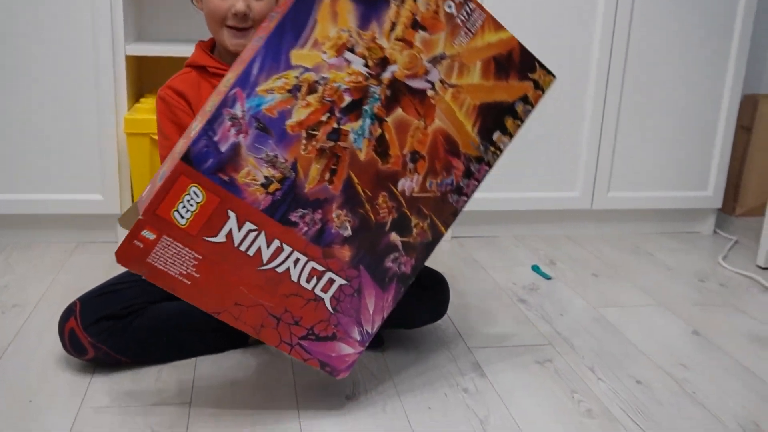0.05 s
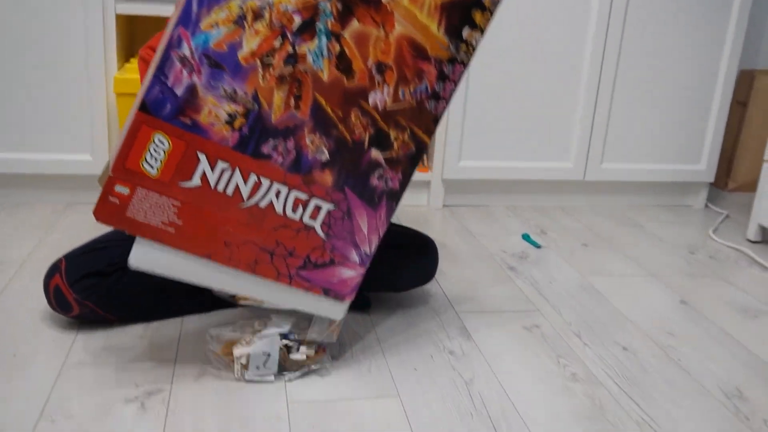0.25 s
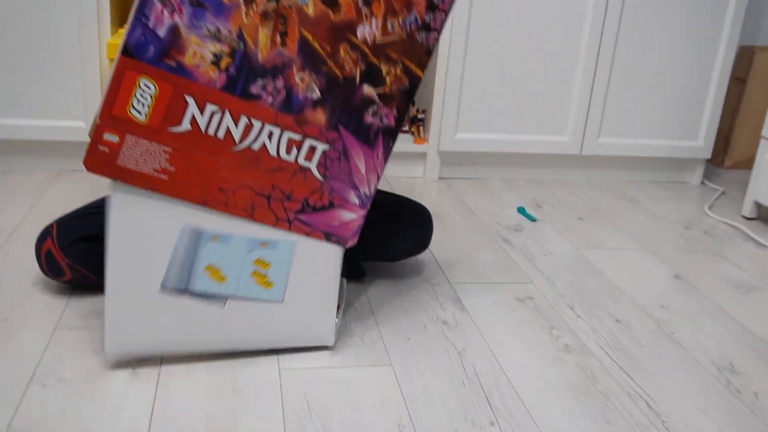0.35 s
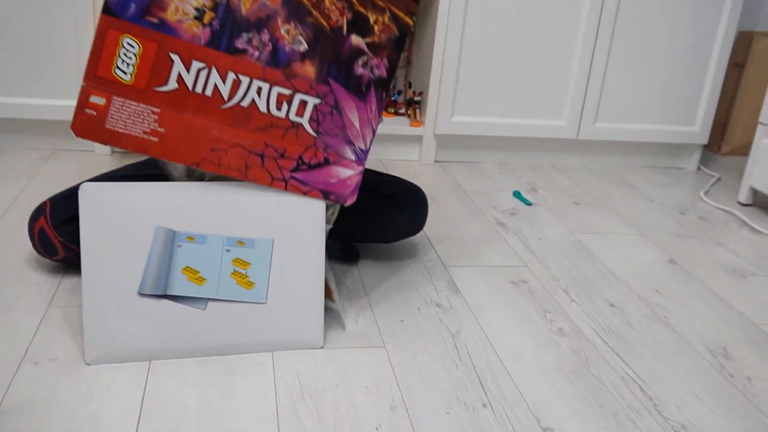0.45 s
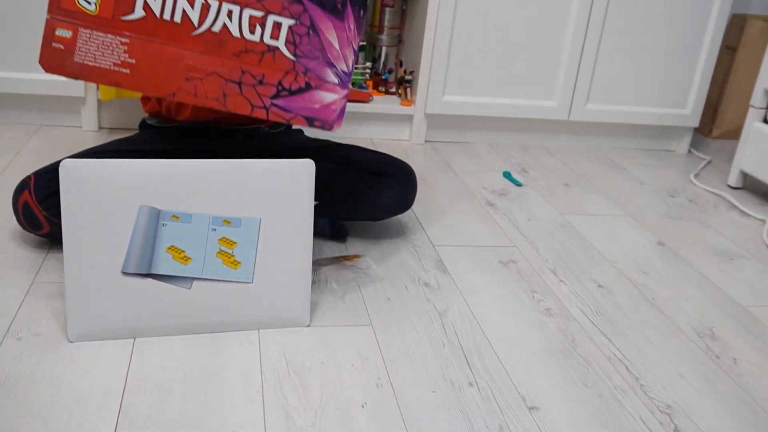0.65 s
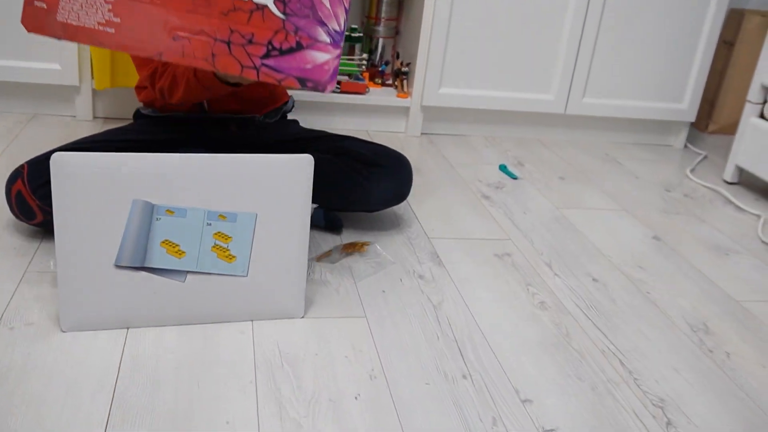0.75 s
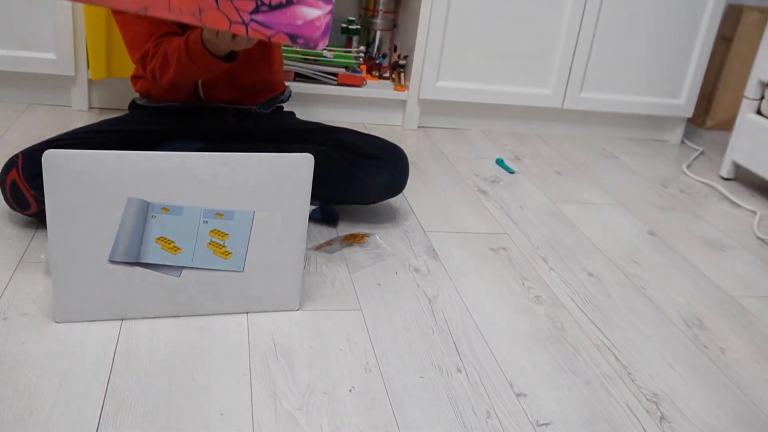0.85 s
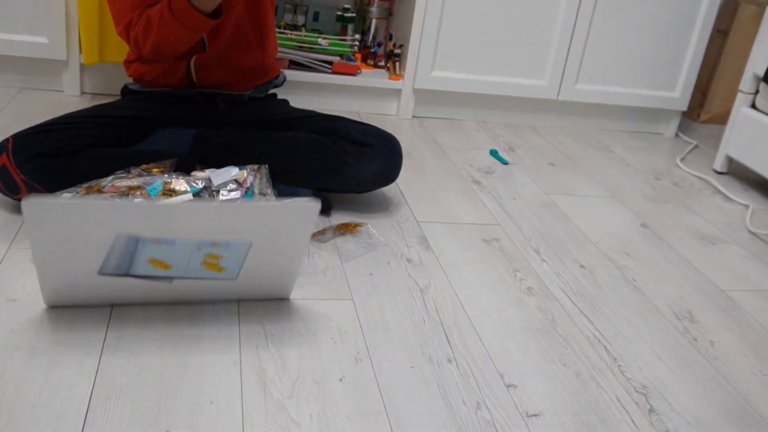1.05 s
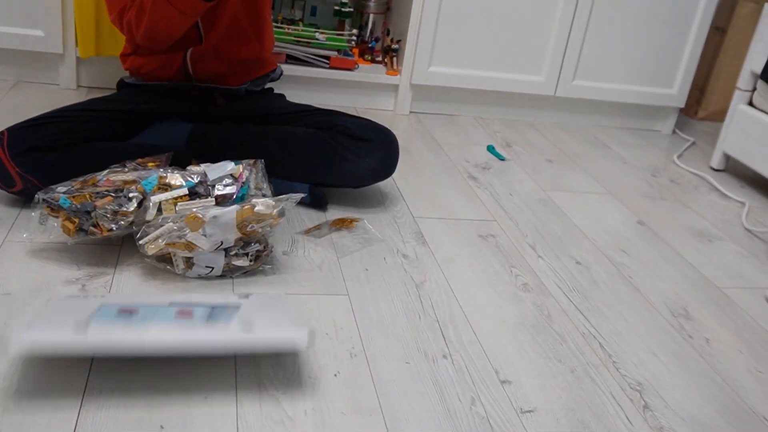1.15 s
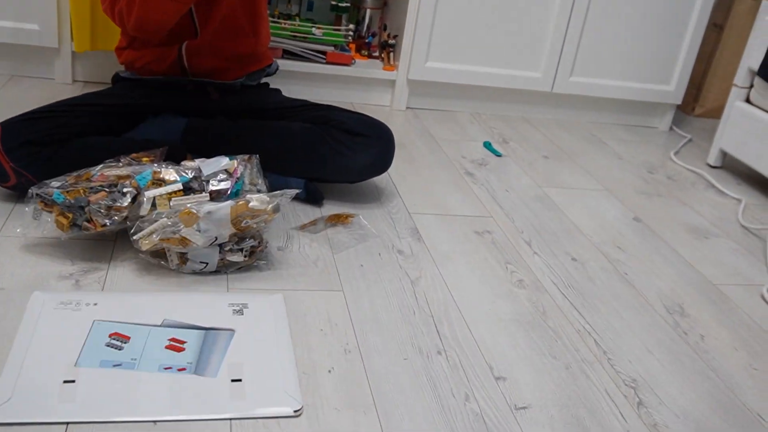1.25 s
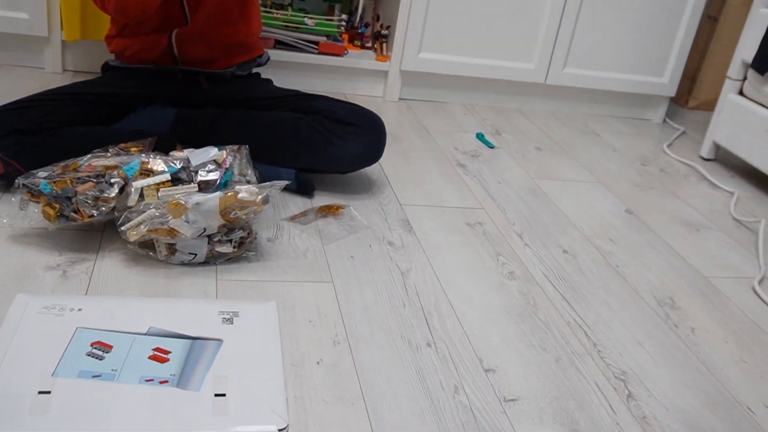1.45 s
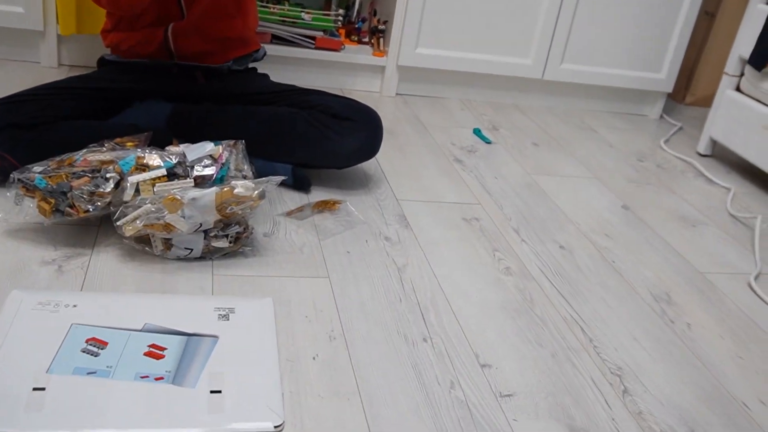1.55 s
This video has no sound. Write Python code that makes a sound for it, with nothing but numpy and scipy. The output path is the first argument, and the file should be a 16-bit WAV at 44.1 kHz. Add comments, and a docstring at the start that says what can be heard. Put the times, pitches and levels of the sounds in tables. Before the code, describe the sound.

Rattling, crinkling bags of small plastic pieces spill out of a box, ending with a loud flat slap

```python
"""In a small, bright room, a cardboard box is tipped out over a laminate floor.
Bags of plastic bricks slide along the card, spill out and land: random contacts rattle, crinkle, rub and drum.
A booklet drops on its edge, stands for a moment and falls flat with a slap: a smeared pulse, a ring and a clap.
The bags tick as they settle: noise bursts with short two-mode rings."""
import sys
import numpy as np
from scipy import signal
from scipy.fft import rfft, irfft
from scipy.io import wavfile

SR = 44100
rng = np.random.default_rng(int(sys.argv[2]) if len(sys.argv) > 2 else 0)


def transcribe(signal):
    """Save signal, clipped to [-1, 1], as a 16-bit WAV file at the path in sys.argv[1]."""
    frames = np.atleast_2d(signal).T
    limited = np.clip(frames, -1, 1)
    pcm = np.round(limited * 32767).astype(np.int16)
    wavfile.write(sys.argv[1], SR, pcm)


N = 70560
TIME = np.arange(N) / SR


def from_db(db):
    """Decibels to gain."""
    return 10 ** (np.asarray(db) / 20)


def rms_one(x):
    """Scale to unit rms."""
    return x / np.sqrt(np.mean(x ** 2) + 1e-20)


def at_hz(points, hz):
    """Read a table on a log-frequency axis."""
    table_hz, value = np.transpose(points)
    return np.interp(np.log(np.maximum(hz, 1)), np.log(table_hz), value)


def level(curve):
    """A dB curve as gain over time."""
    return from_db(np.interp(TIME, *np.transpose(curve)))


def butter(x, order, hz, kind):
    """Butterworth filter."""
    return signal.sosfilt(signal.butter(order, hz, kind, fs=SR, output="sos"), x)


def coloured(x, colour, size=8192):
    """Minimum-phase filter of unit energy with the given spectrum."""
    gain = from_db(at_hz(colour, np.fft.rfftfreq(size, 1 / SR)))
    cepstrum = irfft(np.log(rms_one(gain)))
    fold = 1 + np.sign(size // 2 - np.arange(size))  # fold onto positive time: causal
    fold[0] = 1
    response = irfft(np.exp(rfft(cepstrum * fold)))
    return signal.fftconvolve(x, response)[:N]


def ring(x, hz, t60_s):
    """A unit click sets a decaying cosine of about height 1 ringing, with no deep bass."""
    radius = np.exp(-np.log(1000) / (t60_s * SR))
    angle = 2 * np.pi * hz / SR
    return signal.lfilter([.5, 0, -.5], [1, -2 * radius * np.cos(angle), radius ** 2], x + 1e-18)


def impulse(start_s, level_db):
    """One sharp contact."""
    return from_db(level_db) * (np.arange(N) == int(start_s * SR))


def grains(per_s, spread_db):
    """Random contacts, many small and a few large."""
    sizes = from_db(spread_db * np.minimum(rng.exponential(1, N), 3.5))
    signs = rng.choice([-1, 1], N)
    return sizes * signs * (rng.random(N) < per_s / SR)


# how hard the bags are shaken: time_s, level_db
SHAKING = [(0, -45), (.14, -54), (.22, -38.5), (.27, -25), (.3, -21.5), (.318, -14), (.345, -28),
           (.375, -27.5), (.395, -20.5), (.42, -21), (.44, -29), (.465, -34), (.53, -24.5), (.62, -34),
           (.68, -23.5), (.74, -33), (.8, -41), (.89, -38.5), (.96, -56), (.998, -60), (1.015, -42.5),
           (1.045, -68), (1.075, -47), (1.11, -81), (1.48, -80), (1.497, -48), (1.55, -77)]
# spectrum of the clacks: freq_hz, level_db
BRICK_COLOUR = [(200, -38.5), (700, -8), (1500, -6.5), (2800, -11.5), (4200, -1), (6000, 0), (8000, -6),
                (11000, -11.5), (16000, -20)]
# spectrum of the bag film: freq_hz, level_db
FILM_COLOUR = [(300, -32), (1500, -2), (4000, -2), (8000, -2), (16000, -15.5)]
CLACKS_PER_S, CLACK_SPREAD_DB, BRICK_ROOM_DB = 2400, 3.5, 0.5
CLACK_CYCLES = 6.5  # t60 of the lowest brick, in its own cycles
CRINKLES_PER_S, CRINKLE_SPREAD_DB, CRINKLE_DB = 2500, 3.5, -8


def bricks(count=96):
    """Bricks of many sizes clack together, each ringing briefly, while their bags crinkle."""
    contacts = grains(CLACKS_PER_S, CLACK_SPREAD_DB)
    struck = rng.integers(0, count, N)  # which brick takes each contact
    pitches_hz = np.linspace(1100, 13000, count) * rng.uniform(.99, 1.01, count)
    clacks = np.zeros(N)
    for k, hz in enumerate(pitches_hz):
        t60_s = CLACK_CYCLES / np.sqrt(hz * pitches_hz[0])
        clacks += ring(contacts * (struck == k), hz, t60_s)
    rattle = rms_one(coloured(clacks, BRICK_COLOUR))
    crinkle = rms_one(coloured(grains(CRINKLES_PER_S, CRINKLE_SPREAD_DB), FILM_COLOUR))
    return level(SHAKING) * (rattle + from_db(CRINKLE_DB) * crinkle)


SNAPS_PER_S, SNAP_SPREAD_DB, SNAP_DB, SNAP_ROOM_DB = 410, 3.5, -8.5, -9


def snaps():
    """Creases of film snap over sharply, sparser than the crinkle, close and dry."""
    creases = coloured(grains(SNAPS_PER_S, SNAP_SPREAD_DB), FILM_COLOUR)
    return level(SHAKING) * from_db(SNAP_DB) * rms_one(creases)


# rubbing along the inside of the box: time_s, level_db
SLIDE_LEVEL = [(0, -36), (.075, -42), (.095, -34.5), (.13, -38), (.16, -33.5), (.22, -30.5), (.28, -24),
               (.4, -28.5), (.6, -28.5), (.7, -26.5), (.8, -36), (.87, -42.5), (.91, -40), (.98, -51),
               (1.09, -67), (1.13, -74)]
# spectrum of the rubbing: freq_hz, level_db
SLIDE_COLOUR = [(100, -48), (220, -14), (450, -11.5), (800, -3.5), (1300, -3), (2000, -0.5), (2700, 0.5),
                (4500, -2.5), (8000, -14), (16000, -29.5)]
SLIPS_PER_S, SLIP_SPREAD_DB, SLIDE_ROOM_DB = 5000, 2.5, -5


def slide():
    """Film and paper catch and slip on the card."""
    slips = grains(SLIPS_PER_S, SLIP_SPREAD_DB)
    return level(SLIDE_LEVEL) * rms_one(coloured(slips, SLIDE_COLOUR))


# bags drumming on card and floor: time_s, level_db
DRUM_LEVEL = [(0, -69), (.075, -64), (.09, -40), (.13, -50), (.17, -38), (.23, -41.5), (.265, -32),
              (.315, -29.5), (.37, -27), (.4, -22.5), (.435, -26), (.485, -22.5), (.52, -30), (.59, -31.5),
              (.635, -34), (.685, -26), (.74, -45), (.8, -37), (.85, -53.5), (.93, -52.5), (1.0, -60),
              (1.2, -75)]
# spectrum of the bumps: freq_hz, level_db
DRUM_COLOUR = [(30, -49.5), (75, -42), (115, -17.5), (160, -15.5), (215, -2), (310, 0), (560, -0.5),
               (800, 1), (1200, -1.5), (1900, -6.5), (3200, -18.5), (10000, -45.5)]
# ringing of the card: pitch_hz, level_db, t60_s
CARD_MODES = [(284.8, -44.5, .2), (555, -54, .12), (828, -47, .14), (1097, -44.5, .1)]
BUMPS_PER_S, BUMP_SPREAD_DB, DRUM_ROOM_DB = 1100, 3, -3


def drumming():
    """The loose load bumps the box walls and the boards, and the card rings."""
    bumps = grains(BUMPS_PER_S, BUMP_SPREAD_DB)
    card = sum(from_db(db) * ring(bumps, hz, t60_s) for hz, db, t60_s in CARD_MODES)
    return level(DRUM_LEVEL) * rms_one(coloured(bumps, DRUM_COLOUR) + card)


# centres of the smear as sheets flex on the floor: pitch_hz
FLEX_HZ = [685, 1980]


def flexed(x):
    """Allpasses spread a sharp blow over a millisecond or so."""
    for hz in FLEX_HZ:
        _, poles = signal.iirpeak(hz, 1, fs=SR)
        x = signal.lfilter(poles[::-1], poles, x)
    return x


# booklet edge and bags hit the floor: start_s, level_db, lowpass_hz
LANDINGS = [(0.264, -8, 250), (0.3119, -2, 2550), (0.3934, -9.5, 3000), (0.4505, 12.5, 1200),
            (0.4546, 12.5, 300), (0.4582, 13, 1800), (0.474, 8.5, 700), (0.481, 4, 2390), (.4862, 6, 3400),
            (0.4902, 6, 2784), (0.4972, 7, 2600), (0.565, 6.5, 130), (.609, 4.5, 160), (0.689, 4, 150),
            (1.0634, -19, 260)]
# spectrum of the blows: freq_hz, level_db
THUD_COLOUR = [(30, -31), (80, -25), (160, -5.5), (300, 4), (700, 6.5), (1800, 4), (3000, -6.5),
               (12000, -34.5)]
THUD_ROOM_DB = -7
THUMP_S, THUMP_DB, THUMP_HZ, THUMP_T60_S = .452, -16, 190, 0.032


def thuds():
    """Heavy landings, each as dull as its contact is soft; the boards give under the heaviest."""
    blows = sum(butter(impulse(s, db), 1, hz, "low") for s, db, hz in LANDINGS)
    push = butter(impulse(THUMP_S, THUMP_DB), 1, 2 * THUMP_HZ, "low")
    return coloured(flexed(blows), THUD_COLOUR) + ring(push, THUMP_HZ, THUMP_T60_S)


# spectrum of the flat landing: freq_hz, level_db
SLAP_COLOUR = [(30, -49), (100, -32), (175, 0), (230, -2.5), (330, 6), (450, -4.5), (640, -11.5), (850, 2),
               (1150, -6.5), (1650, 3), (2200, -2), (2900, -7), (3700, -6.5), (5500, -12.5), (9000, -22),
               (16000, -35)]
# ringing of booklet, floor and room: pitch_hz, level_db, t60_s
SLAP_MODES = [(179, -45.5, 0.16), (285.5, -39.5, 0.22), (356.4, -39, 0.16), (863, -41.5, 0.2),
              (1520, -50, 0.39), (1590, -46, 0.36), (1890, -45, 0.42), (2120, -47, 0.35), (2256, -46, 0.41)]
# spectrum of the air pushed out: freq_hz, level_db
RUSH_COLOUR = [(200, -14), (550, -14), (830, 5), (1200, -6), (3500, -6), (12000, -37)]
SLAP_S, SLAP_DB, SLAP_ROOM_DB = 1.272, 13.5, 10
RUSH_DB, RUSH_RISE_DB_PER_S = -44.5, 329


def slap(echoes):
    """The falling booklet pushes air aside, then hits the floor in one pulse that leaves a ring."""
    pulse = flexed(impulse(SLAP_S, SLAP_DB))
    ringing = np.zeros(N)
    for hz, db, t60_s in SLAP_MODES:
        ringing += from_db(db) * ring(pulse, hz, t60_s) * rng.choice([-1, 1])
    swell = from_db(RUSH_DB - RUSH_RISE_DB_PER_S * np.abs(SLAP_S - TIME)) * (TIME < SLAP_S)
    rush = coloured(swell * rng.standard_normal(N), RUSH_COLOUR)
    landing = coloured(pulse, SLAP_COLOUR) + rush
    return in_room([(landing, SLAP_ROOM_DB)], [echoes]) + ringing


# clap thrown back by nearby surfaces: delay_s, level_db (relative to the clap)
CLAP_ECHOES = [(.0122, -4), (.0178, -11), (.0305, -7)]
CLAP_DB, CLAP_BAND_HZ = 13.5, (820, 1670)


def clap():
    """Trapped air leaves in one sharp clap, with its first distinct echoes."""
    pulses = impulse(SLAP_S, CLAP_DB)
    for delay_s, db in CLAP_ECHOES:
        pulses = pulses + impulse(SLAP_S + delay_s, CLAP_DB + db)
    return butter(pulses + 1e-18, 2, CLAP_BAND_HZ, "band")


# single bricks click, folds of film snap: start_s, level_db, pitch_hz, crack_db (relative to the ring)
CLICKS = [(0.0538, -18.5, 2720, 0), (0.0839, -9, 2500, -5), (0.0862, -9, 1290, -3), (0.146, -11, 2970, 3),
          (.157, -11.5, 8500, 4), (0.2626, -5.5, 4130, 5), (.293, -2, 4570, -1), (0.3148, 1.5, 5000, 1.5),
          (0.422, -8, 5000, -1), (.6955, -11, 5550, 1), (0.891, -14, 3620, 4), (1.002, -20, 3860, 1.5),
          (1.0072, -16, 1400, -2), (1.02, -19, 2600, -3), (1.0631, -19, 3000, 5), (1.069, -21, 2600, 0),
          (1.1408, -31, 3100, -5), (1.196, -15, 3330, 0), (1.487, -24, 4230, 3), (1.4878, -23, 5300, -8),
          (1.5218, -26.5, 2630, -2), (1.571, -22.5, 1760, -12)]
# spectrum of the cracks: freq_hz, level_db
CRACK_COLOUR = [(100, -43), (300, -21.5), (1000, -18), (1900, -2), (4000, 2.5), (8000, -3.5), (11000, -8.5),
                (16000, -20)]
CLICK_RING_T60_S, OVERTONE_RATIO, OVERTONE_DB, CLICK_RING_ROOM_DB = .0065, 1.47, -4, -7
CRACK_DECAY_S, CRACK_ROOM_DB = 0.0021, 2.5
CLICK_LOW_CUT_HZ = 1250  # small pieces radiate no bass


def clicks():
    """Each click is a tiny noise burst and a brief ring of two modes; gives (cracks, rings)."""
    cracks, rings = np.zeros((2, N))
    for start_s, db, hz, crack_db in CLICKS:
        size = from_db(db) / np.sqrt(N)  # sets energy, as each part has unit rms over N
        age_s = np.maximum(TIME - start_s, 0)
        decay = (age_s > 0) * (np.exp(-age_s / CRACK_DECAY_S) + 1e-12)
        cracks += size * from_db(crack_db) * rms_one(rng.standard_normal(N) * decay)
        contact = impulse(start_s, 0)
        low_mode = ring(contact, hz, CLICK_RING_T60_S)
        high_mode = ring(contact, OVERTONE_RATIO * hz, CLICK_RING_T60_S)
        rings += size * rms_one(low_mode + from_db(OVERTONE_DB) * high_mode)
    return coloured(cracks, CRACK_COLOUR), butter(rings, 4, CLICK_LOW_CUT_HZ, "high")


# faint rustle as everything comes to rest: time_s, level_db
SETTLE_LEVEL = [(1.28, -90), (1.32, -42), (1.42, -48), (1.47, -57), (1.53, -56), (1.6, -59)]
# spectrum of the rustle: freq_hz, level_db
SETTLE_COLOUR = [(300, -48.5), (1200, -26.5), (1600, -2.5), (2200, 2.5), (3000, -10), (7000, -19),
                 (16000, -42.5)]
SETTLE_SLIPS_PER_S = 900


def settling():
    """The last small slips of paper and film, in separate grains."""
    slips = grains(SETTLE_SLIPS_PER_S, CRINKLE_SPREAD_DB)
    return level(SETTLE_LEVEL) * rms_one(coloured(slips, SETTLE_COLOUR))


# decay of the echoes: freq_hz, t60_s
ROOM_T60 = [(100, 0.26), (260, .27), (800, 0.25), (1840, 0.32), (4850, 0.38), (12800, 0.29)]
# width of the echoes: freq_hz, side_minus_mid_db
ROOM_SIDE = [(100, -32), (250, -31), (500, -14.5), (1000, -18), (2000, -14), (4000, -8), (8000, -4),
             (12000, 0)]
WALL_DELAY_S, EARLY_DB, ROOM_HOLD_S = 0.0095, -4, 0.016


def room_echoes(count=19):
    """Mid and side response: weak floor echoes, then the walls, dying away band by band."""
    out = np.zeros((2, N))
    edges_hz = np.geomspace(40, 19000, count + 1)
    white = rng.standard_normal((2, 2, N))
    build = np.where(TIME < WALL_DELAY_S, from_db(EARLY_DB), 1) * (TIME > .001)
    decay_time_s = np.maximum(TIME - ROOM_HOLD_S, 0)
    for k, (low, high) in enumerate(zip(edges_hz, edges_hz[1:])):
        hz = np.sqrt(low * high)
        # neighbouring bands use different noise; reversal puts the filter's tail first
        band = butter(white[k % 2], 2, [low, high], "band")[:, ::-1]
        band = band * build * np.exp(-np.log(1000) * decay_time_s / at_hz(ROOM_T60, hz))
        width = from_db(at_hz(ROOM_SIDE, hz))
        out += np.sqrt(high - low) * np.array([rms_one(band[0]), width * rms_one(band[1])])
    return out / np.linalg.norm(out[0])


DIRECT_SIDE_DB, ECHO_CHANGE_S = -7, .045


def in_room(sources, places):
    """Left and right of (sound, room_db) sources that move through places with different echoes."""
    direct = sum(x / np.hypot(1, from_db(db)) for x, db in sources)
    sent = sum(x / np.hypot(1, from_db(-db)) for x, db in sources)
    mid, side = direct, from_db(DIRECT_SIDE_DB) * np.gradient(direct)
    turns = [(TIME / ECHO_CHANGE_S - k) / len(places) for k in range(len(places))]
    nearness = np.maximum(np.cos(2 * np.pi * np.array(turns)), 0) ** 2 + 1e-9
    shares = nearness / np.linalg.norm(nearness, axis=0)  # constant power
    for share, echoes in zip(shares, places):
        wet = signal.fftconvolve((share * sent)[None], echoes[:, :N // 2], axes=1)[:, :N]
        mid, side = mid + wet[0], side + wet[1]
    return np.array([mid + side, mid - side])


# spectrum of the room's air: freq_hz, level_db
AIR_COLOUR = [(100, 0.5), (250, -8.5), (1000, -14.5), (4000, 0.5), (16000, -24.5)]
AIR_DB = -84


def quiet_air():
    """Steady coloured noise of the room's air."""
    return from_db(AIR_DB) * coloured(rng.standard_normal(N), AIR_COLOUR)


def scene(count=4):
    """All sources in one room, over its quiet air."""
    places = [room_echoes() for _ in range(count)]
    cracks, rings = clicks()
    sources = [
        (bricks(), BRICK_ROOM_DB), (snaps(), SNAP_ROOM_DB),
        (slide(), SLIDE_ROOM_DB), (drumming(), DRUM_ROOM_DB), (thuds(), THUD_ROOM_DB),
        (cracks, CRACK_ROOM_DB), (rings, CLICK_RING_ROOM_DB),
        (settling(), SLIDE_ROOM_DB), (quiet_air(), 0)]
    return slap(places[0]) + clap() + in_room(sources, places)


LOW_CUT_HZ, PEAK_LIMIT, CUTOFF_HZ = 101, 1.4, 16000


def record(dry):
    """The microphone thins the bass, peaks are rounded, the top is cut steeply."""
    thin = butter(dry, 2, LOW_CUT_HZ, "high")
    rounded = PEAK_LIMIT * np.tanh(thin / PEAK_LIMIT)
    steep = signal.ellip(10, .2, 70, CUTOFF_HZ, fs=SR, output="sos")
    return signal.sosfilt(steep, rounded)


dry = scene()
out = record(dry)
transcribe(out)
```